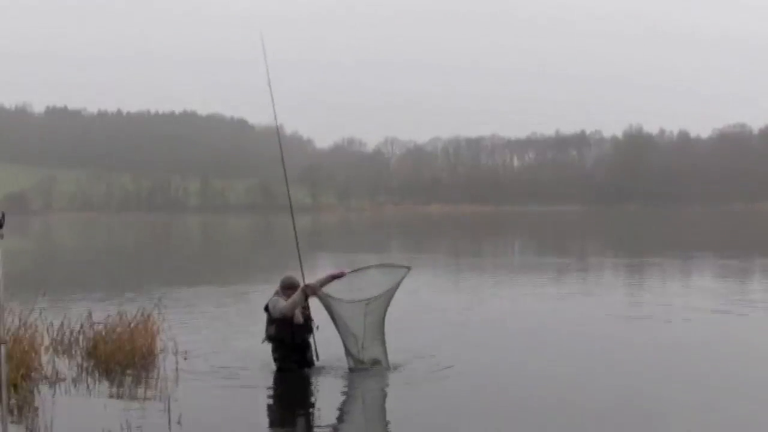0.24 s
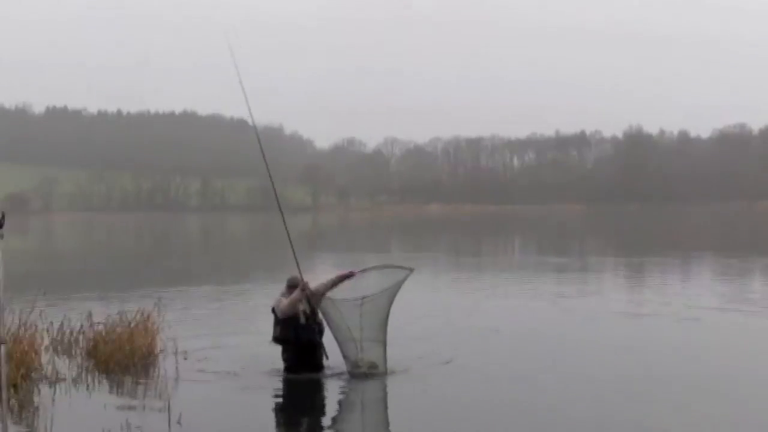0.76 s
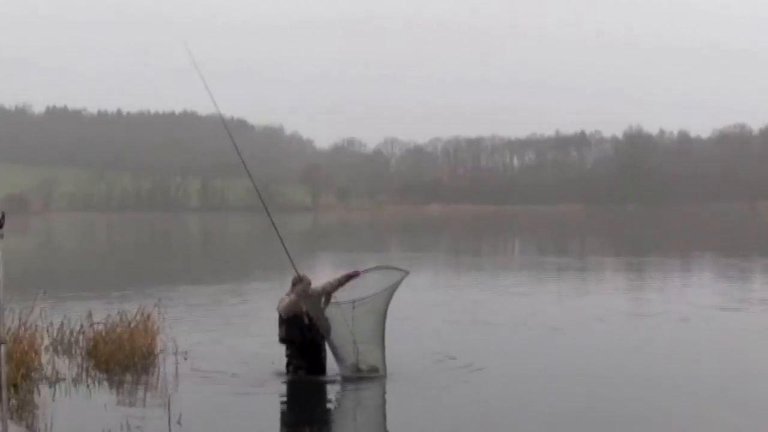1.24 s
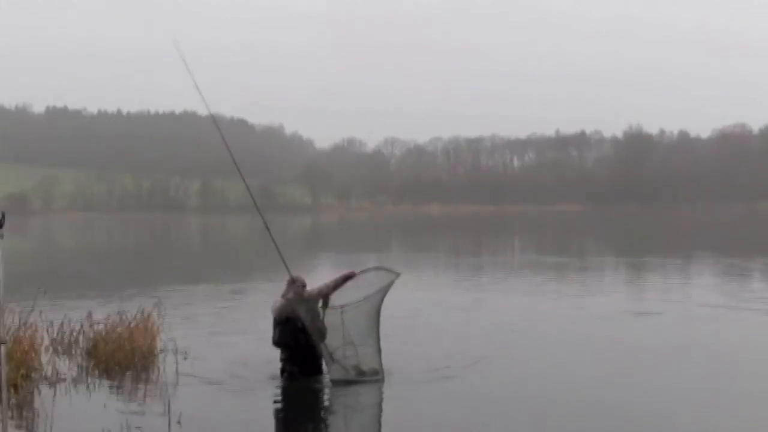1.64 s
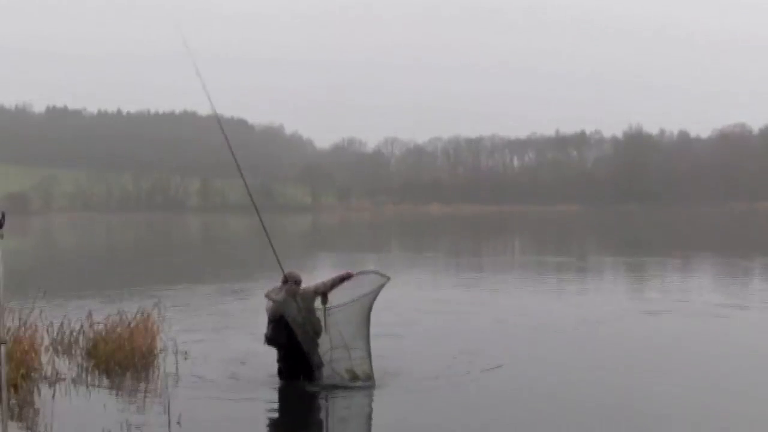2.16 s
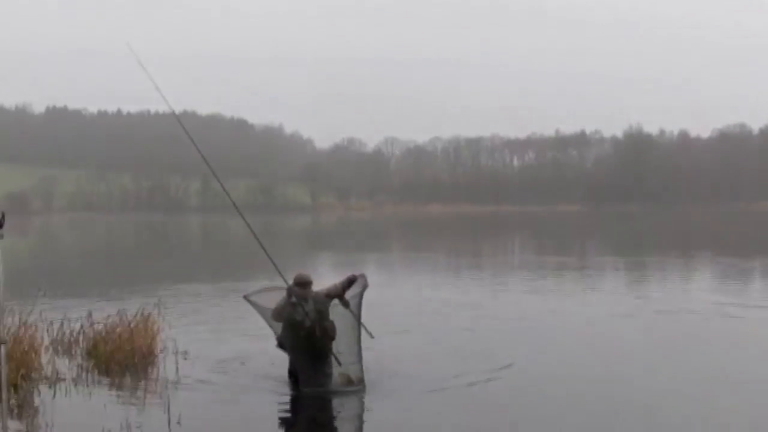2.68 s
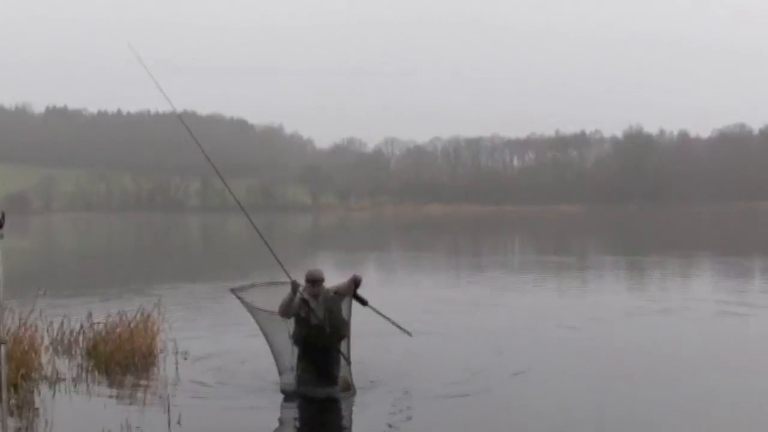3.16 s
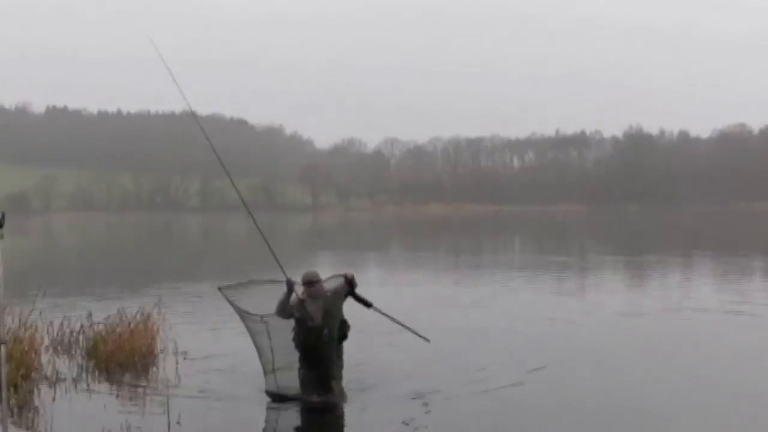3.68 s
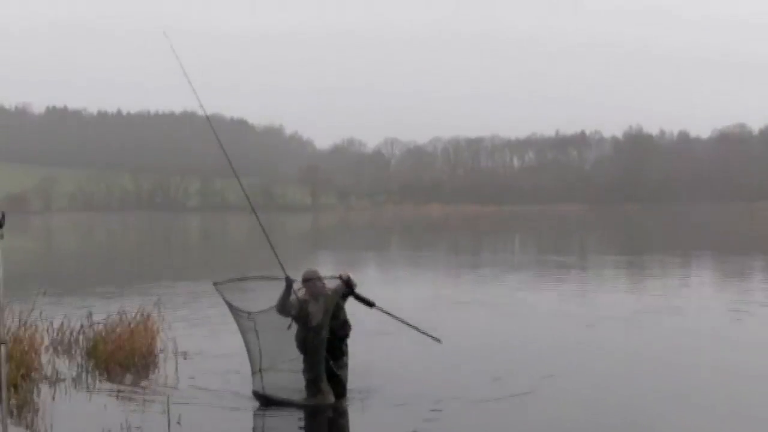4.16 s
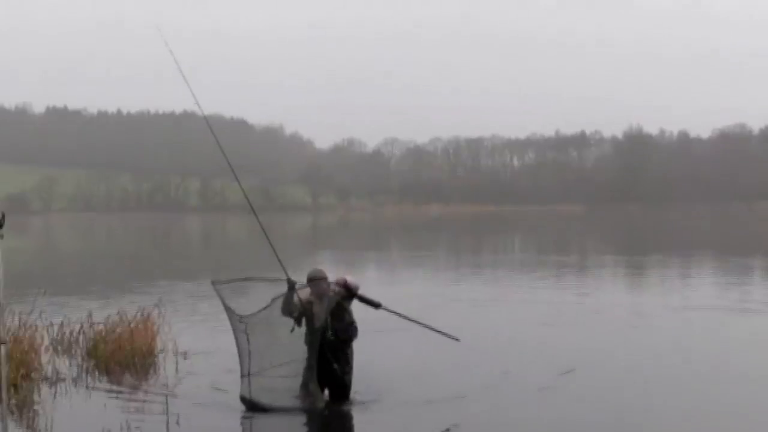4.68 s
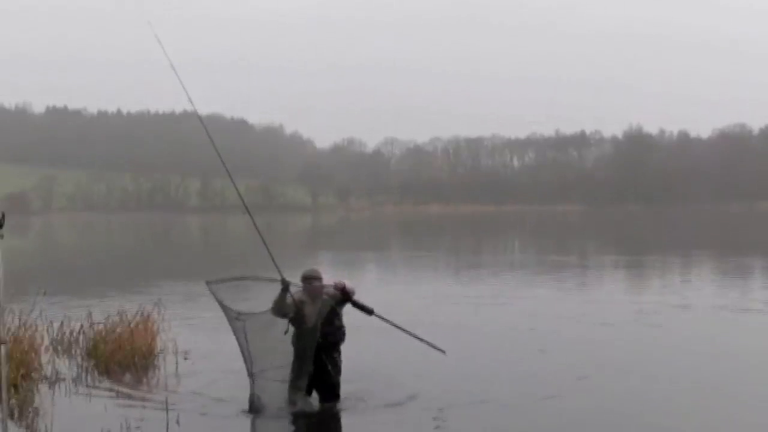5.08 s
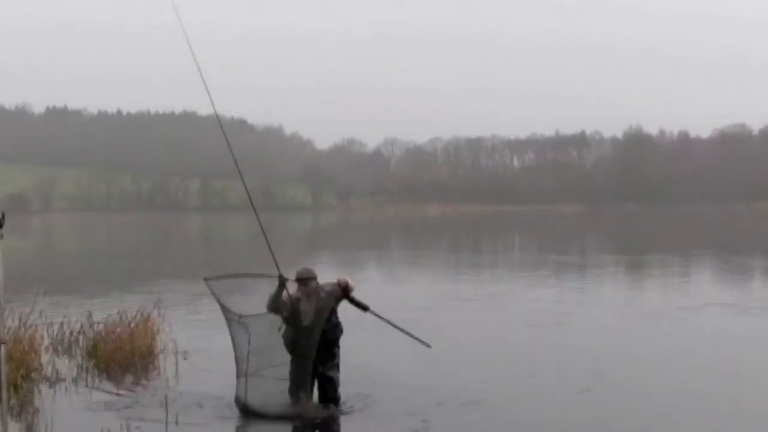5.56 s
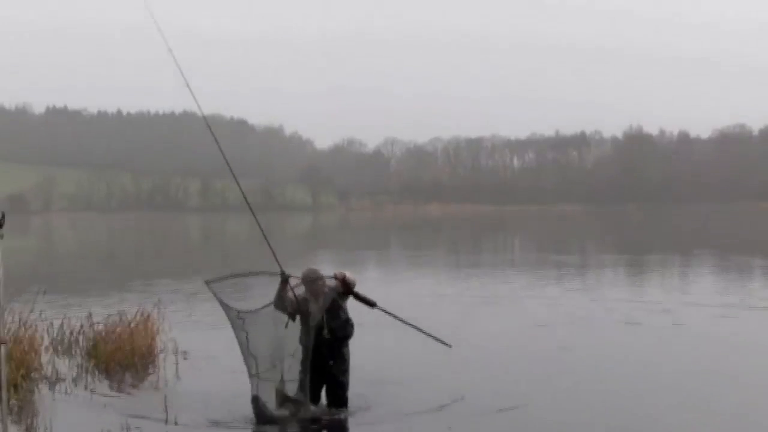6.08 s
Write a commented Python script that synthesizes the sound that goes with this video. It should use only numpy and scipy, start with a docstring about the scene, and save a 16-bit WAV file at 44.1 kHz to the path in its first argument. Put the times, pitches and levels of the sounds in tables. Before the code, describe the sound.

Outdoor lake ambience, wide and hissy, with soft wind rumble. Faint crow calls sit to the left and a distant engine drone rises, then disappears. Soft surges of water from legs and net swell and ebb with isolated bubbly plinks and drips. Around five seconds a sudden bright splash pours and drains, gurgles follow, and a weaker pour closes, with another faint steady engine behind.

```python
"""Landing net in a still lake

An angler wades and drags a landing net: water sloshes, gurgles, drips and twice pours off the mesh.
The water is swarms and single ringing bubbles over shaped noise, partly scattered by ripples and reeds.
Crows caw as filtered pulses and noise, two far engines drone as sine pairs, light wind rumbles as noise.
The camera adds hiss and a whine, and its close pair of ports turns the water's treble out of phase.
"""
import sys
import numpy as np
from scipy import signal
from scipy.fft import rfft, irfft, next_fast_len
from scipy.io import wavfile
from scipy.ndimage import map_coordinates

SR = 44100
rng = np.random.default_rng(int(sys.argv[2]) if len(sys.argv) > 2 else 0)


def undo_db(level):
    """Turn decibels back into plain size, where 20 dB means ten times bigger."""
    steps = np.asarray(level, float) / 20
    return 10 ** steps


def store_pcm(level_fs):
    """Save levels as 16-bit WAV."""
    pcm = np.round(np.clip(level_fs, -1, 1) * 32767).astype(np.int16)
    wavfile.write(sys.argv[1], SR, np.atleast_2d(pcm).T)


N = 279329
T = np.arange(N) / SR  # time in seconds

# Pushes of legs and net through the water. Each row: crest in seconds, slosh level there in dB.
SURGES = [(.1, -57), (.7, -52.5), (1.2, -54.5), (2.05, -52), (3.2, -51.5), (4, -51.5), (4.9, -53),
          (5.85, -49)]
# Water pouring off the mesh. Each row: start in seconds, hold in seconds, slosh level in dB, spray level in dB.
POURS = [(5.044, 0.05, -35.5, -36.5), (5.168, 0.14, -39.5, -40), (5.343, 0.15, -48, -47),
         (6.016, 0.063, -47, -47), (6.094, 0.071, -43.5, -45.5), (6.22, 0.13, -44.5, -50)]
# Single bubbles. Each row: start in seconds, size in dB before the ring's envelope, first pitch in Hz,
# life in cycles, pitch rise over that life as a share.
BUBBLES = [(.04, -35, 833, 10, 0.099), (.084, -37.5, 1710, 18, .05), (0.107, -35, 1270, 12, 0.36),
           (.128, -36, 1670, 20, .05), (.711, -32, 745, 33, 0.078), (.735, -32.5, 890, 21, 0.33),
           (1.178, -33.5, 1570, 32, .1), (1.249, -42.5, 740, 29, 0.071), (1.764, -30.5, 650, 3.8, 0.17),
           (2.043, -31.5, 1350, 9.2, 0.11), (2.115, -33, 1240, 28, 0.044), (3.166, -32.5, 910, 36, 0.037),
           (3.168, -41, 1450, 22, 0.52), (3.216, -38.5, 1090, 35, 0.083), (3.242, -32.5, 1100, 24, 0.049),
           (4.057, -37, 513, 33, 0.35), (4.907, -28.5, 596, 3.7, 0.12), (4.998, -23.5, 453, 1.4, 0.11),
           (5.09, -26, 1046, 17, 0.24), (5.124, -25.5, 660, 8.8, 0.55), (5.163, -22, 520, 9.6, 0.036),
           (5.183, -23.5, 440, 11, 0.45), (5.19, -22.5, 1240, 11, 0.12), (5.27, -27, 978, 21.3, 0.38),
           (5.474, -31, 623, 9.4, 0.2), (5.534, -24, 170, 1.2, 0.54), (5.717, -31, 375, 8, 0.13),
           (5.714, -34, 1055, 35, 2.4), (5.729, -35, 1225, 36, 1.1), (5.746, -24, 373, 3.5, 0.2),
           (5.81, -37, 1260, 28, 1.9), (5.846, -28, 960, 9.3, 0.21), (5.851, -43, 1360, 40, 1.6),
           (5.944, -29.5, 1880, 11, .05), (5.974, -33.5, 1950, 24, 0.78), (5.996, -38.5, 1015, 38, .08),
           (6.151, -21.5, 1040, 3.4, 0.17), (6.164, -31.5, 220, 12.6, 0.35), (6.167, -27.5, 747, 12, 0.82),
           (6.3, -37, 640, 22, 0.23)]
# Drops that tick on the surface. Each row: start in seconds, size in dB before the envelope, first pitch in Hz.
DROPS = [(.571, -26, 3200), (1.123, -29, 1360), (1.18, -26.5, 3070), (1.317, -25, 2360), (1.721, -35, 746),
         (2.017, -31, 1590), (2.993, -23, 2740), (3.408, -34, 2200), (3.524, -41, 1000),
         (3.954, -22.5, 1860), (3.967, -23, 1710), (4.146, -32.5, 1430), (4.8, -24, 2000),
         (4.887, -24, 3120), (5.476, -20, 4770), (5.577, -24, 3770), (6.048, -24, 1990), (6.294, -18, 3150)]
# Colour of the slosh's wash. Each row: frequency in Hz, relative level in dB per Hz.
SLOSH_COLOUR = [(250, -7), (480, -5), (1250, 4.5), (2500, -8.5), (3500, -33)]
# Colour of the fine spray. Each row: frequency in Hz, relative level in dB per Hz.
SPRAY_COLOUR = [(1700, -6), (2600, -4), (3600, 2), (4600, -9), (6800, -23), (8800, -21), (10200, -3),
                (11600, -7), (14000, -24)]
# The pair of ports, for sound from the water. Each row: frequency in Hz, lead of the right in radians,
# right over left in dB.
PORTS = [(100, 0, 0), (1100, .6, -1), (1800, 1.9, 9), (3100, 3.9, 7), (4100, 3.9, 0), (7000, 3.15, 0)]
# Crow calls. Each row: start in seconds, end in seconds, pitch in Hz, level in dB before the throat,
# weight of noise against pulses from 0 to 1.
CAWS = [(.46, .72, 410, -43, .15), (.7, .88, 328, -42, .06), (1.05, 1.45, 420, -44, .92)]
# Throat resonances. Each row: centre in Hz, width in Hz of one of two equal passes, peak level in dB.
THROAT = [(830, 150, -12), (1320, 300, -4), (1660, 480, -2), (2300, 300, -10)]
# The engine that speeds up. Each row: time in seconds, firing tone in Hz, its level in dB, octave level in dB.
ENGINE_SPEEDING = [(0, 138.8, -45, -60.5), (1, 153.6, -44.5, -63), (2.1, 171.3, -48.5, -60),
                   (2.6, 178.4, -58.5, -60), (3, 182, -66, -71)]
# The steadier engine. Each row: time in seconds, firing tone in Hz, its level in dB, octave level in dB.
ENGINE_STEADY = [(4.95, 144.3, -52, -80), (6.33, 142, -52.5, -78)]
# Wind rumble and far air, both ports alike. Each row: frequency in Hz, relative level in dB per Hz.
AIR_ALIKE = [(20, -15), (45, -1), (80, -4), (110, -10.5), (200, -18), (330, -20.5), (480, -25.5),
             (1100, -32.5), (2400, -48)]
# The part of the air that differs between ports. Each row: frequency in Hz, relative level in dB per Hz.
AIR_OPPOSITE = [(25, -1), (80, -2), (300, -8.5), (640, -10.5), (950, -7), (1670, -12), (2400, -23)]
# Camera hiss in opposite phase. Each row: frequency in Hz, relative level in dB per Hz.
HISS_OPPOSITE = [(1200, -12), (2400, -3), (3500, 0), (10500, 0), (15200, -2), (15650, -14), (15800, -8)]
# Camera hiss in phase. Each row: frequency in Hz, relative level in dB per Hz.
HISS_ALIKE = [(2400, 3), (3500, -1.5), (5500, -0.5), (8000, -5), (14500, -9), (15500, 1.5)]
# Thin whining lines. Each row: frequency in Hz, level on the left in dB.
WHINE = [(15450, -73), (15510, -73), (15731.5, -68)]
# Bands that the camera filters out. Each row: centre in Hz, width in Hz, depth in dB.
NOTCHES = [(2850, 800, 30), (4990, 300, 17)]


def unit(x):
    """Scales to rms 1."""
    return x / np.sqrt(np.mean(x ** 2) + 1e-20)


def along(points, hz, column=1):
    """Reads a column of (Hz, value, ..) points on a log frequency axis."""
    points = np.asarray(points)
    return np.interp(np.log(hz + 1), np.log(points[:, 0] + 1), points[:, column])


def curves(rows):
    """Gives one value per sample for each column after the time."""
    seconds, *columns = np.transpose(rows)
    return [np.interp(T, seconds, column) for column in columns]


def wobble(rate):
    """Draws a smooth random curve with rate knots a second."""
    knots = rng.standard_normal(int(N * rate / SR) + 4)
    return map_coordinates(knots, [T * rate])


def filtered(x, response):
    """Passes x through a complex response of frequency."""
    m = next_fast_len(N + 8192)
    return irfft(rfft(x, m) * response(np.fft.rfftfreq(m, 1 / SR)), m)[..., :N]


def resonance(hz, centre, width):
    """Response of a simple resonator that passes its centre unchanged."""
    damping = 1j * hz * width
    return damping / (centre ** 2 - hz * hz + damping)


def noise(spectrum):
    """Coloured noise of rms 1, falling to -80 dB an octave beyond either end of its spectrum."""
    closed = [(spectrum[0][0] / 2, -80), *spectrum, (spectrum[-1][0] * 2, -80)]
    return unit(filtered(rng.standard_normal(N), lambda hz: undo_db(along(closed, hz))))


def plinks(s, size, hz, cycles, rise, length):
    """Sums damped sines: a bubble rings for some cycles and its pitch climbs as it nears the surface."""
    t = np.arange(int(length * SR)) / SR
    age = t * (hz / cycles)[:, None]  # in lives
    turns = cycles[:, None] * age * (1 + np.reshape(rise, (-1, 1)) * age / 2)
    swell = np.exp(-3 * age) * (1 - np.exp(-age / .09))
    rings = size[:, None] * swell * np.sin(2 * np.pi * turns)
    at = (s * SR).astype(int)[:, None] + np.arange(len(t))
    return np.bincount(at.ravel(), rings.ravel(), N + SR)[:N]


def swarm(count, centre_hz, spread, cycles, scatter_db, length):
    """Random grains of rms 1: log-normal pitch, uneven life and rise, a few much louder than the rest."""
    u, g = rng.random((count, 4)), rng.standard_normal(count)
    start = u[:, 0] * N / SR
    size = undo_db(-scatter_db * np.log(1 - .99 * u[:, 1]))
    hz = np.clip(centre_hz * np.exp(spread * g), 150, SR / 3)
    life = cycles * (.5 + u[:, 2])
    rise = u[:, 3] ** 2 / 2
    return unit(plinks(start, size, hz, life, rise, length))


def water():
    """Gurgling bubbles on a wash, fine spray, and the single bubbles and drops that stand out."""
    slosh_gain, spray_gain = stirring()
    gurgle = swarm(count=3200, centre_hz=1150, spread=.5, cycles=6, scatter_db=2.4, length=.03)
    trickle = swarm(count=1100, centre_hz=1650, spread=.36, cycles=9, scatter_db=4.2, length=.015)
    wash = undo_db(3.5 * wobble(35)) * noise(SLOSH_COLOUR)
    slosh = unit(gurgle + undo_db(-3.5) * trickle + .4 * wash)
    fizz = swarm(count=7000, centre_hz=6500, spread=.6, cycles=2, scatter_db=3.4, length=.002)
    fizz = unit(filtered(fizz, lambda hz: undo_db(along(SPRAY_COLOUR, hz))))
    mist = undo_db(2.6 * wobble(40)) * noise(SPRAY_COLOUR)
    spray = unit(fizz + .45 * mist)
    s, db, hz, cycles, rise = np.transpose(BUBBLES)
    bubbles = plinks(s, undo_db(db), hz, cycles, rise, length=0.076)
    s, db, hz = np.transpose(DROPS)
    drops = plinks(s, undo_db(db), hz, np.full(len(hz), 3.5), rise=.4, length=.01)
    return slosh_gain * slosh + spray_gain * spray + bubbles + drops


def stirring():
    """Gains of slosh and spray: surges swell and ebb, pours start fast, hold and drain; their powers add."""
    rise_db_per_s, fall_db_per_s = 21, 27.5
    surge_spray_db, spray_steepness = -4.5, 1.15  # spray swells and fades faster than the slosh
    attack_s, drain_db_per_s = 0.032, 103
    s, db = np.transpose(SURGES)[..., None]
    under_db = np.where(T < s, rise_db_per_s * (T - s), fall_db_per_s * (s - T))
    surge_slosh = undo_db(db + under_db)
    surge_spray = undo_db(db + surge_spray_db + spray_steepness * under_db)
    s, hold, slosh_db, spray_db = np.transpose(POURS)[..., None]
    drain = undo_db(-drain_db_per_s * np.clip(T - s - hold, 0, None))
    flow = np.clip((T - s) / attack_s, 0, 1) * drain
    slosh = [*surge_slosh, *(undo_db(slosh_db) * flow)]
    spray = [*surge_spray, *(undo_db(spray_db) * flow)]
    return np.linalg.norm(slosh, axis=0), np.linalg.norm(spray, axis=0)


def scattered(x):
    """Mids thrown about by ripples and reeds: a short random answer, unlike at each port, ever renewed."""
    level_db, t60_s, centre_hz = -2.5, .03, 2100  # level ahead of the mid filter
    hop = SR // 20
    t = np.arange(hop) / SR
    wet = np.zeros((2, N + 4 * hop))
    for start in range(0, N, hop):
        piece = x[start:start + 2 * hop]
        window = np.sin(np.pi * np.arange(len(piece)) / (2 * hop))  # overlapping pieces add in power
        tail = rng.standard_normal((2, hop)) * undo_db(-60 * t / t60_s)
        tail = tail / np.linalg.norm(tail[0])
        answer = signal.fftconvolve((piece * window)[None], tail, axes=1)
        wet[:, start:start + answer.shape[1]] += answer
    return undo_db(level_db) * filtered(wet[:, :N], lambda hz: resonance(hz, centre_hz, centre_hz) ** 2)


def ports(x, lead=1, tilt=1):
    """One source at both ports: alike in the bass, out of phase towards the treble; lead and tilt scale it."""
    def both(hz):
        level = undo_db(tilt * along(PORTS, hz, column=2) / 2)
        half = level * np.exp(.5j * lead * along(PORTS, hz))
        return np.array([1 / half, half])
    return filtered(x, both)


def crows():
    """Each caw: throat pulses at its pitch, mixed with noise, swelling and fading unevenly."""
    voice = np.zeros(N)
    for start, end, hz, db, share in CAWS:
        cycle = np.cumsum(hz * (1 + .015 * wobble(40))) / SR
        pulses = sum(np.cos(2 * np.pi * k * cycle) for k in range(1, 10))
        swell = np.sin(np.pi * np.clip((T - start) / (end - start), 0, 1)) ** .6
        rasp = np.sqrt(1 - share) * unit(pulses) + 3 * np.sqrt(share) * rng.standard_normal(N)
        voice += undo_db(db + 4 * wobble(20)) * swell * rasp
    return filtered(voice, lambda f: sum(undo_db(db) * resonance(f, c, w) ** 2 for c, w, db in THROAT))


def engine(rows):
    """A far exhaust tone with its octave, wavering in the air, faded at both ends."""
    hz, db, octave_db = curves(rows)
    phase = 2 * np.pi * np.cumsum(hz) / SR + 0.27 * wobble(9)
    fade_in = np.clip((T - rows[0][0]) * 10 + 1, 0, 1)
    fade_out = np.clip((rows[-1][0] - T) * 10 + 1, 0, 1)
    tone = undo_db(db + 0.25 * wobble(6.5)) * np.sin(phase)
    octave = undo_db(octave_db + wobble(3.6)) * np.sin(2 * phase)
    return np.sqrt(2) * fade_in * fade_out * (tone + octave)  # root 2 makes the levels rms


def air():
    """Wind rumbles alike on both ports; an opposite-phase part makes the far air wide."""
    mid = undo_db(-41 + 0.81 * wobble(2.91)) * noise(AIR_ALIKE)
    side = undo_db(-51.5 + 0.1 * wobble(1.8)) * noise(AIR_OPPOSITE)
    return np.array([mid + side, mid - side])


def camera_noise():
    """Hiss mostly in opposite phase, and thin steady sines at the top, weaker and inverted on the right."""
    side = undo_db(-53.5) * noise(HISS_OPPOSITE)
    mid = undo_db(-62.0) * noise(HISS_ALIKE)
    lines = np.zeros(N)
    for hz, db in WHINE:
        lines += np.sqrt(2) * undo_db(db) * np.sin(2 * np.pi * (hz * T + rng.random()))
    return np.array([mid + side, mid - side]) + lines * [[1], [-.2]]


def scene():
    """Water in front, crows to the left, engines near the middle, air all round."""
    wet = water()
    lake = ports(wet) + scattered(wet)
    birds = ports(crows(), lead=-1.3, tilt=0)  # the left leads
    engines = engine(ENGINE_SPEEDING) * undo_db([[1.2], [-1.2]]) + engine(ENGINE_STEADY)
    return lake + birds + engines + air()


def band_limit(x):
    """A steep low-pass at the top of the band."""
    return signal.sosfilt(signal.butter(12, 15960, fs=SR, output="sos"), x)


def record(dry):
    """The camera adds its noise, filters out two bands and cuts off the top."""
    top_hz = 15800

    def response(f):
        cuts = [1 - (1 - undo_db(-db)) * resonance(f, c, w) for c, w, db in NOTCHES]
        return np.prod(cuts, axis=0) * (f < top_hz)
    mix = filtered(dry + camera_noise(), response)
    return band_limit(mix)


dry = scene()
out = record(dry)
store_pcm(out)
```